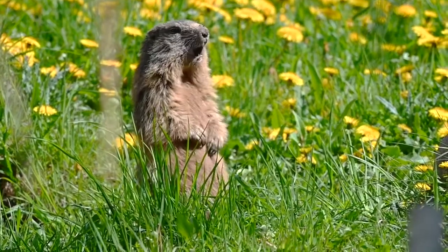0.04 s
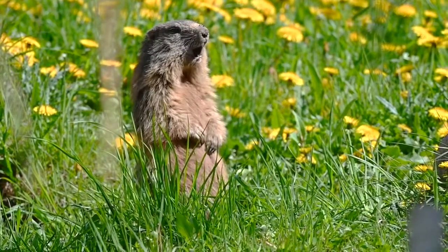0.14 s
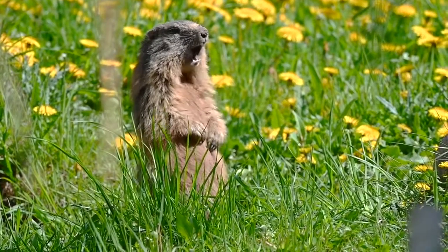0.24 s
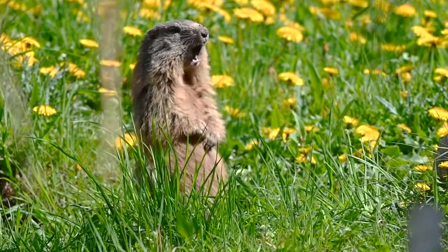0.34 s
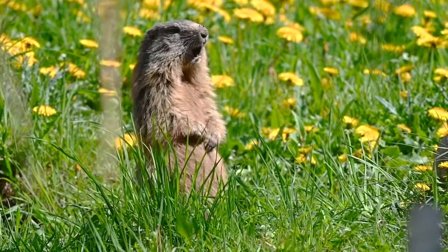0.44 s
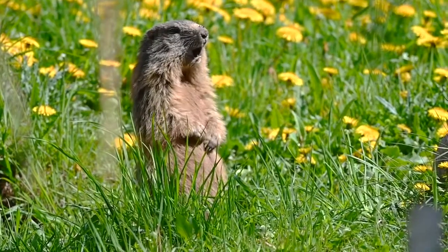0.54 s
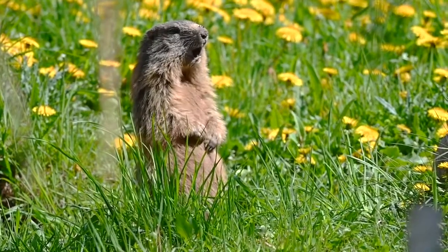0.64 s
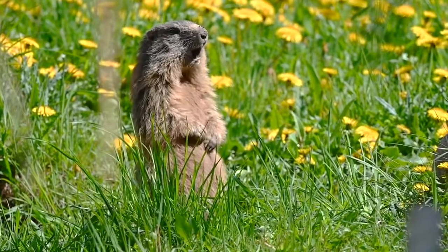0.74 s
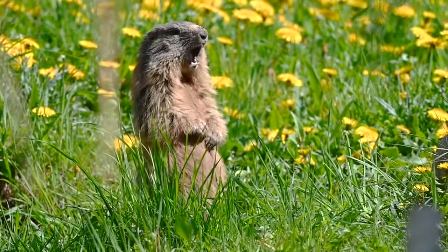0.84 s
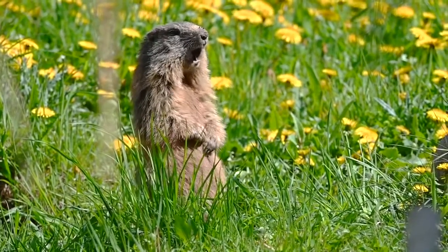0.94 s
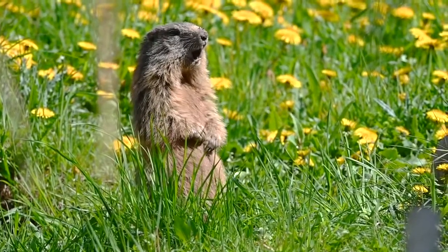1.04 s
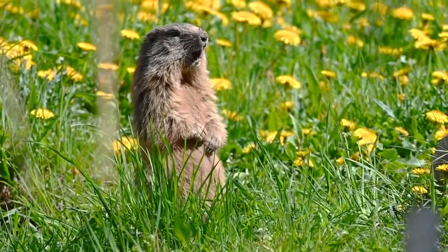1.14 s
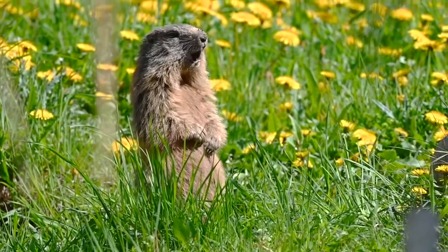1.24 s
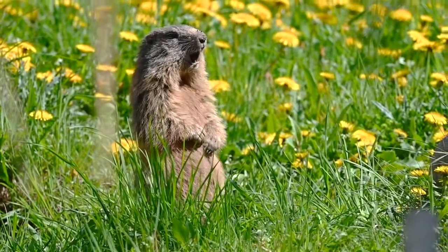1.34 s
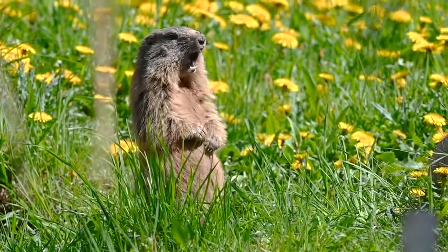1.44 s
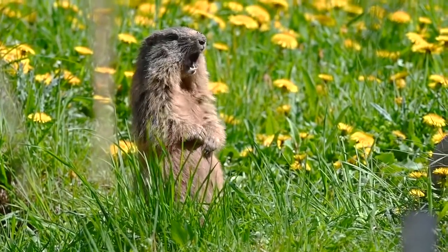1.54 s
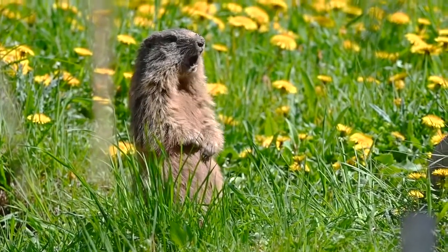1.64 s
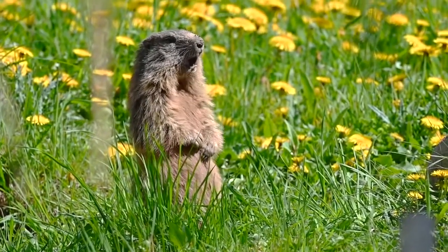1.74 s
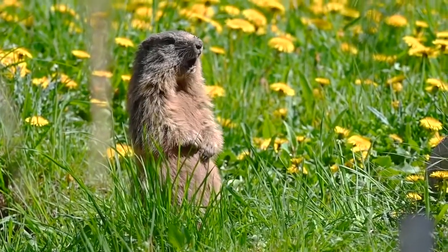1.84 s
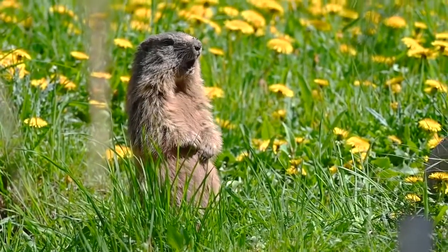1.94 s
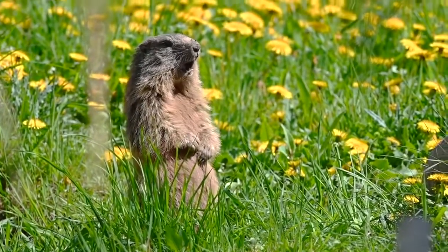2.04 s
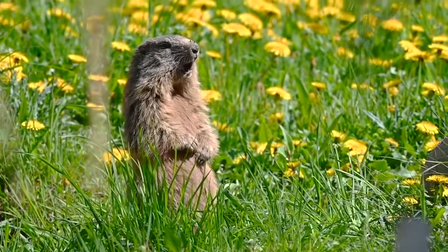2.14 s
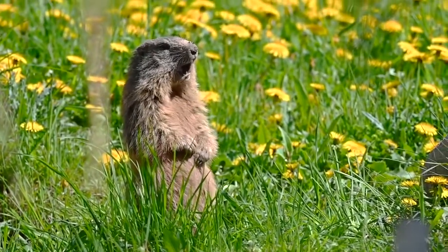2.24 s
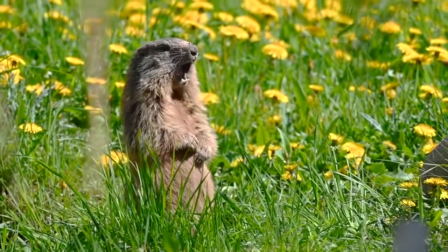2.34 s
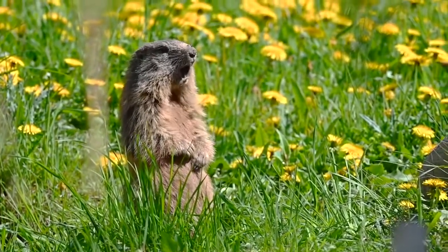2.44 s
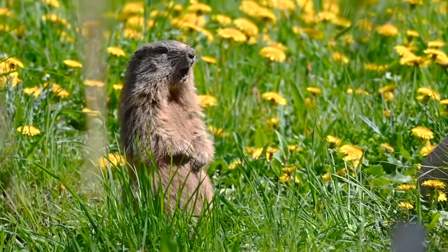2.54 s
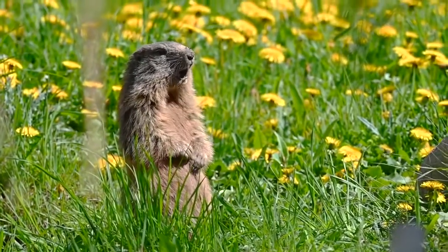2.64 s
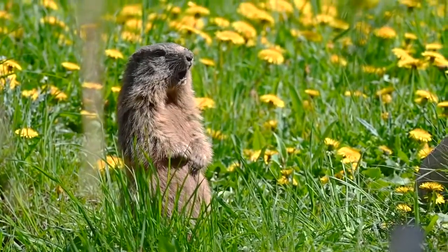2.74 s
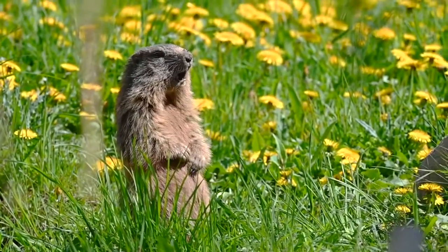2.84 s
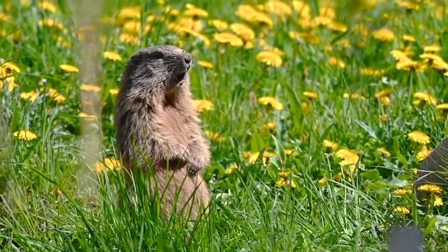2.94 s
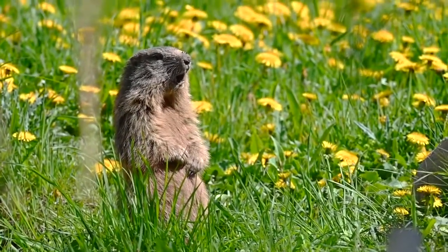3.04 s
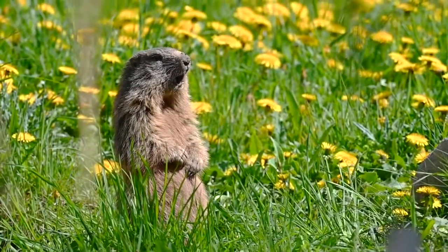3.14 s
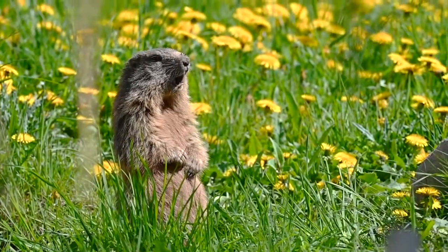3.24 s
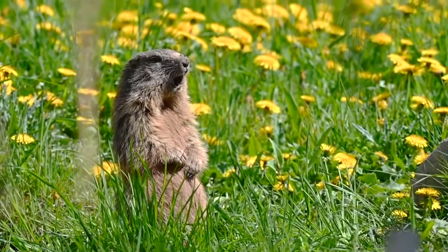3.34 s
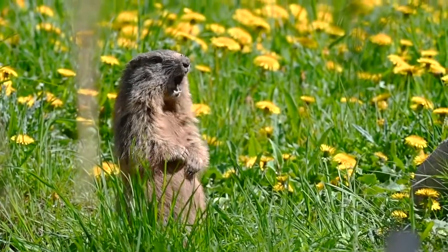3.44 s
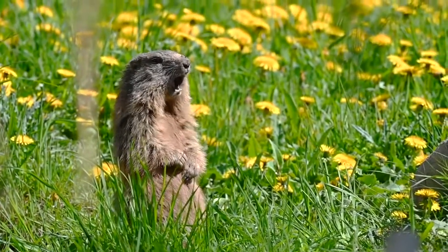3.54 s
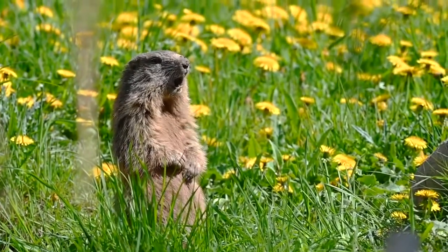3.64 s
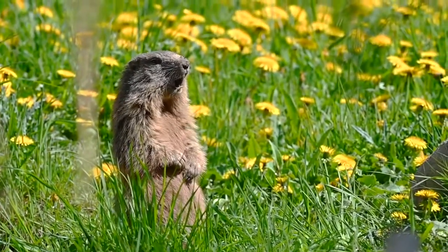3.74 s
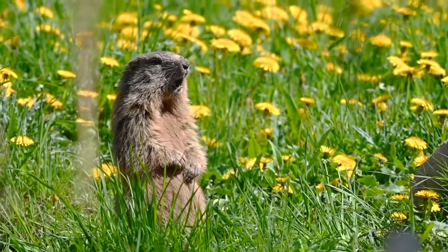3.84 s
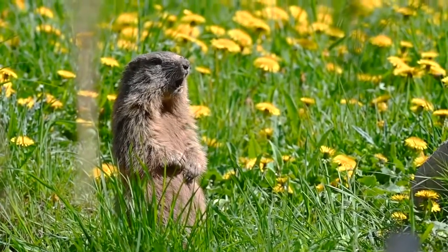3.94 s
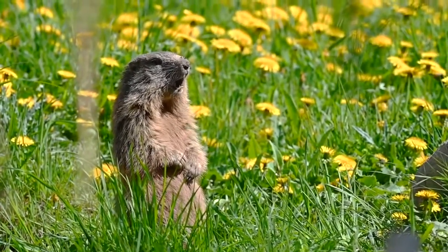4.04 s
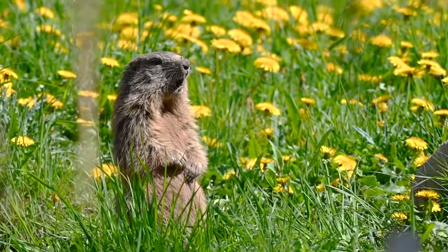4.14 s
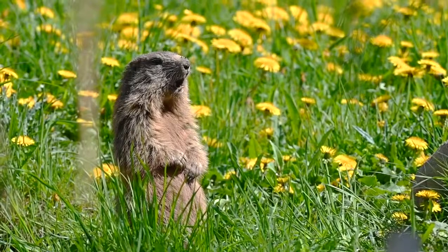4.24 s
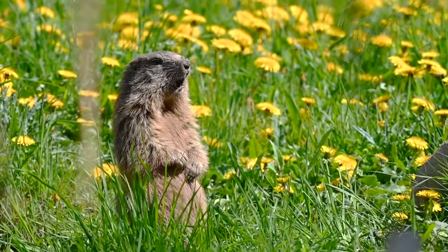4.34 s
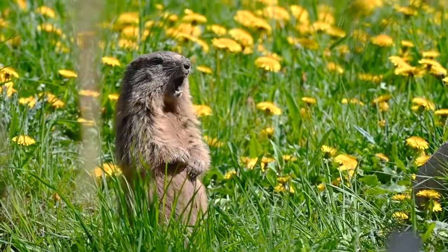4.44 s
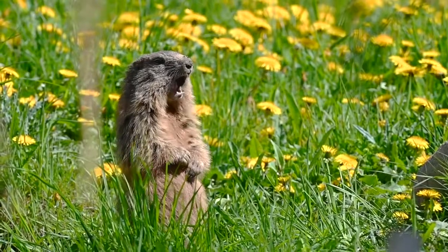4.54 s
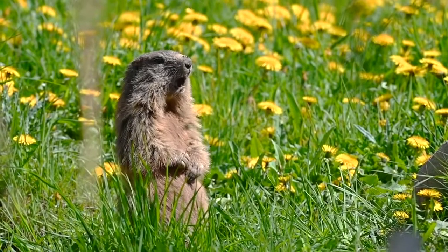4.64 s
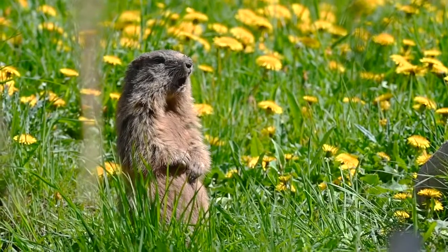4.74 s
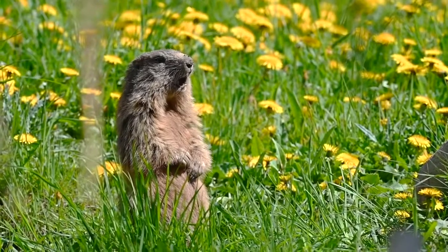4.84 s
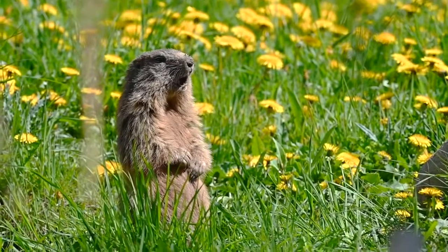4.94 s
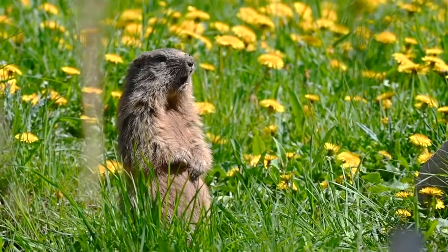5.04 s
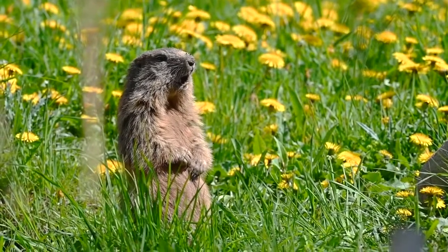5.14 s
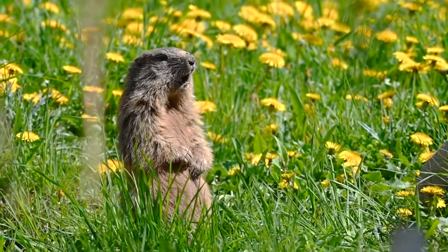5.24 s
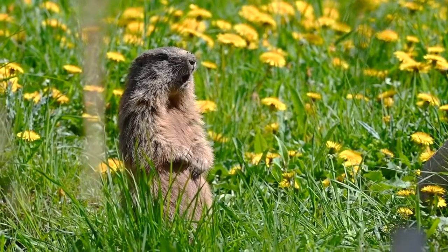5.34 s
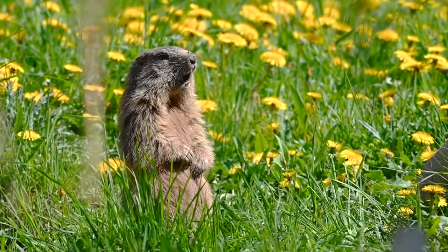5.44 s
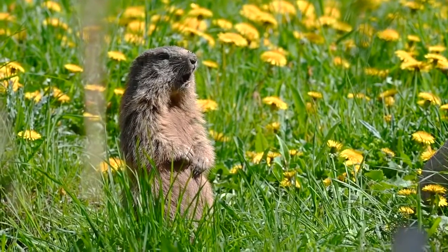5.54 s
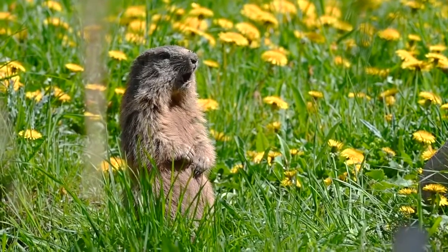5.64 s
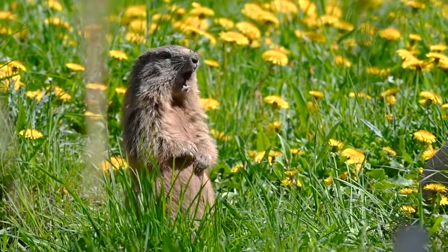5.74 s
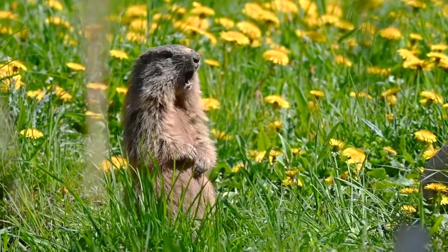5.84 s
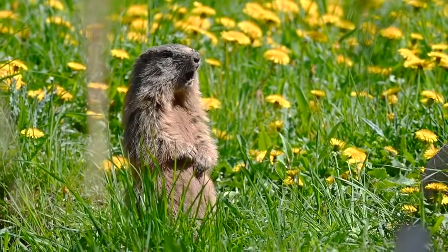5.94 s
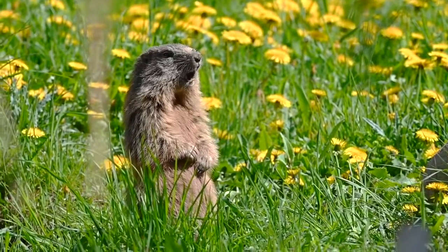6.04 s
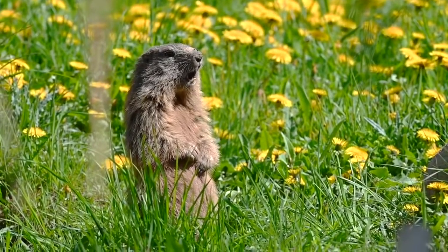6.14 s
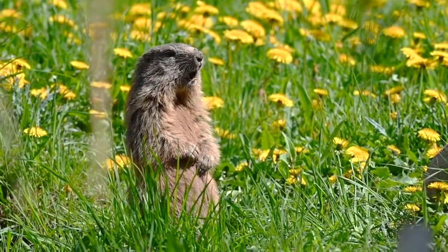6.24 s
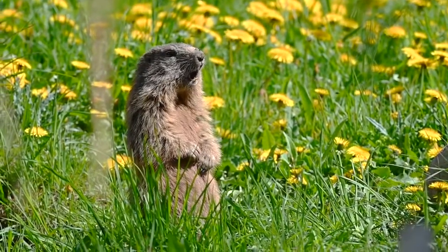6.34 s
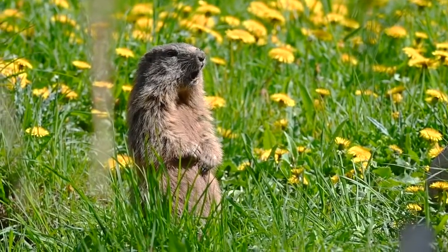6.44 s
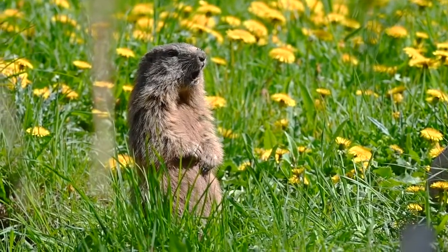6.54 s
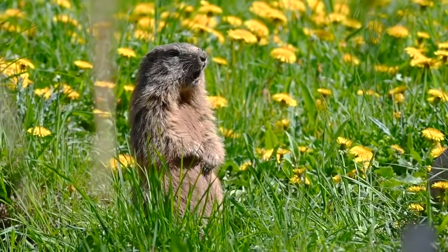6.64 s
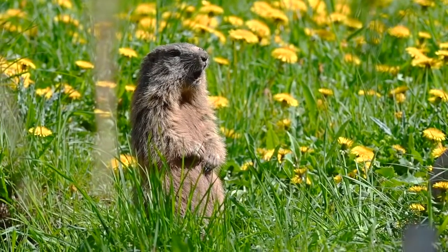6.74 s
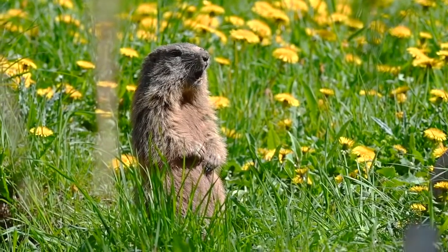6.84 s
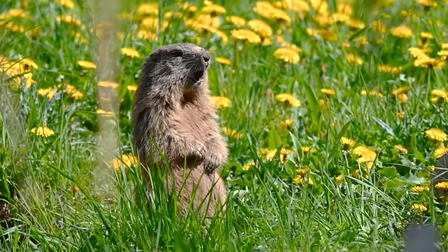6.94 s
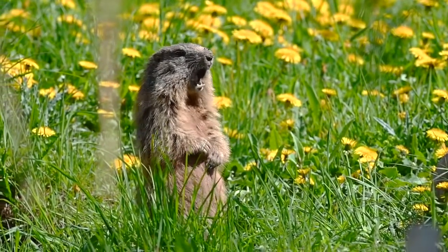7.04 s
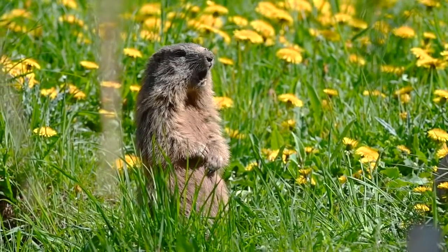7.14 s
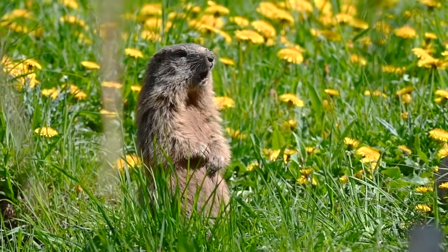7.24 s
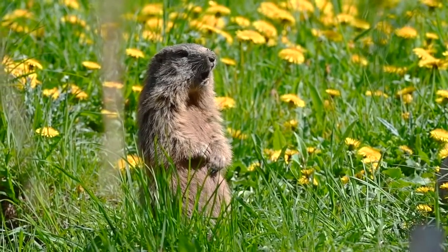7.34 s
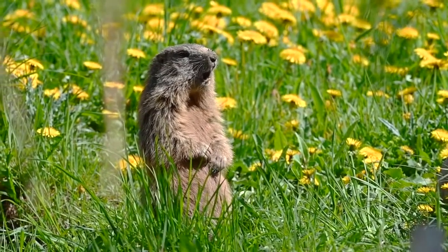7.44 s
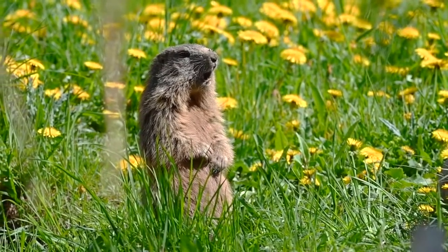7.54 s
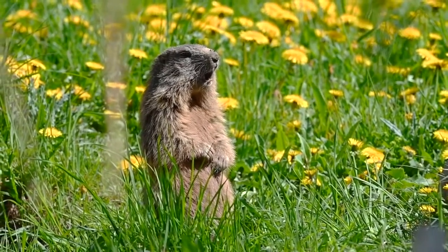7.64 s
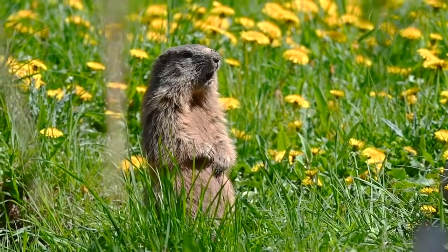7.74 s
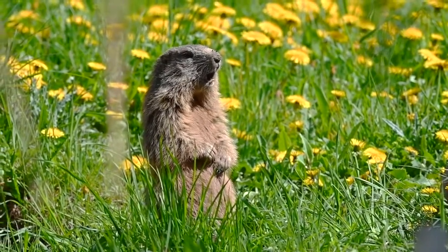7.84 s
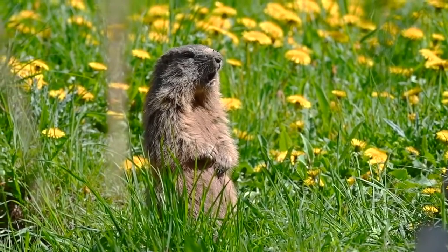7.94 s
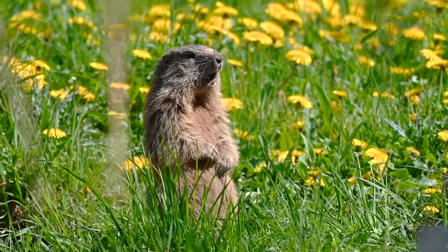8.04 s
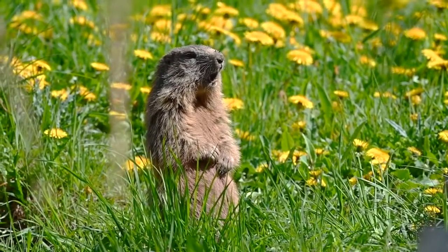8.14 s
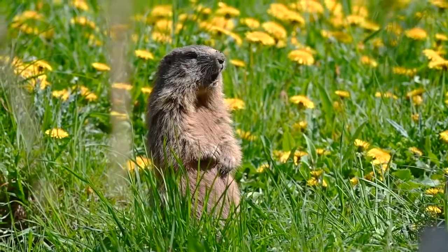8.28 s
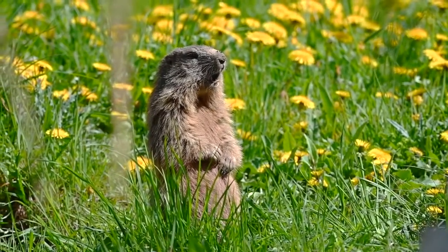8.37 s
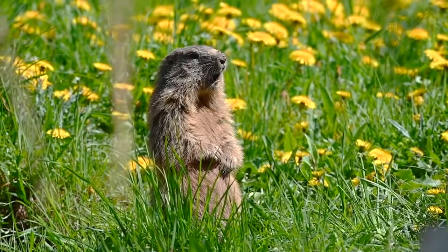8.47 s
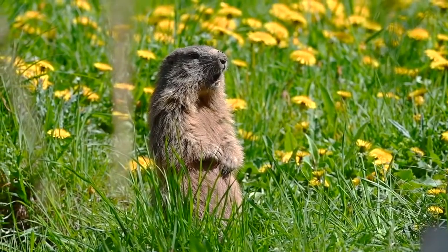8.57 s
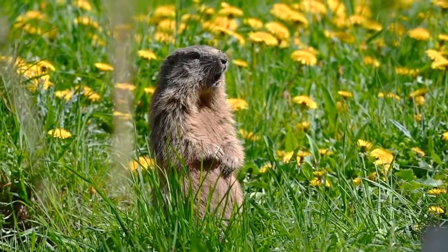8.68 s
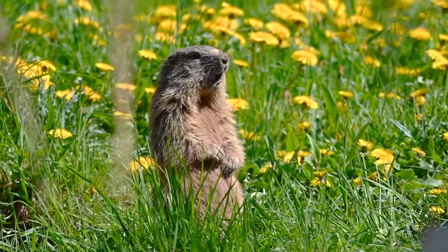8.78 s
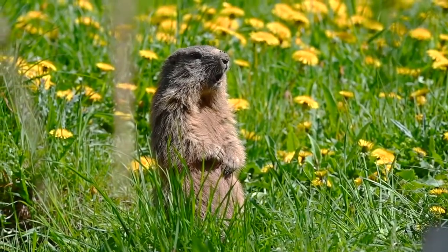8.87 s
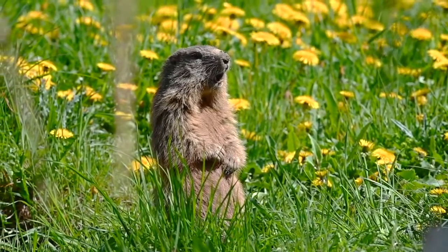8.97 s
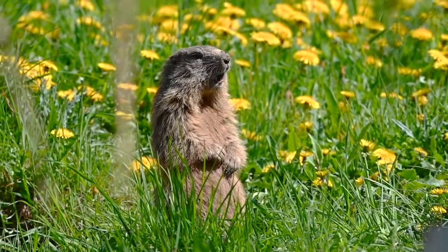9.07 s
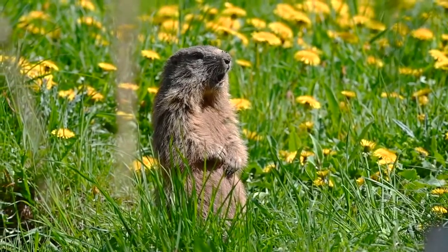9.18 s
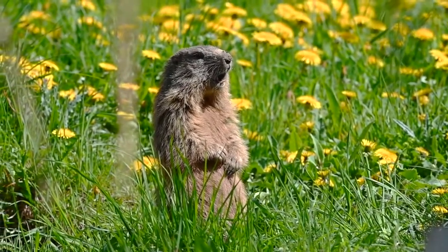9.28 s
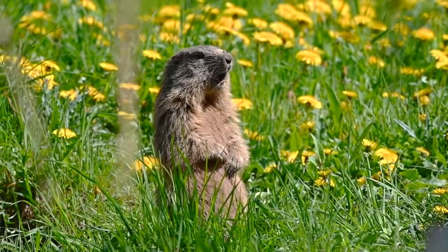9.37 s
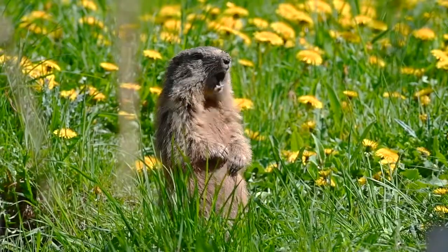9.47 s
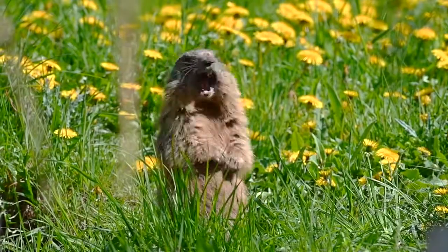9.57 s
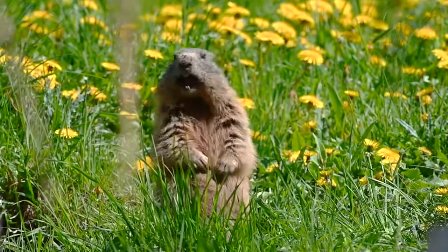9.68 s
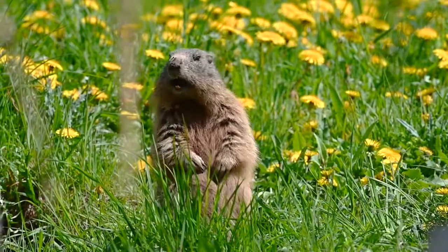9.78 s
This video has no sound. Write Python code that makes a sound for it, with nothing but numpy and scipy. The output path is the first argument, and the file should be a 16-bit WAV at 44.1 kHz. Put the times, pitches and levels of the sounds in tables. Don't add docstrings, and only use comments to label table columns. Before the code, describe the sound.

Sharp, short marmot alarm whistles ring out and echo across an open meadow, over soft air hiss, scattered sparrow chirps and a fading distant engine.

```python
import sys
import numpy as np
from scipy import signal
from scipy.fft import rfft, irfft
from scipy.io import wavfile
from scipy.ndimage import uniform_filter1d

SR = 44100
rng = np.random.default_rng(int(sys.argv[2]) if len(sys.argv) > 2 else 0)


def int16_out(signal):
    q = np.round(np.clip(np.atleast_2d(signal).T, -1, 1) * 32767)
    wavfile.write(sys.argv[1], SR, q.astype(np.int16))


def undo_db(level):
    steps = np.asarray(level, float) / 20
    return 10 ** steps


N = 432621
LEAD = SR // 2
LAG = 5


def evened(x):
    return x / np.sqrt(np.mean(x ** 2) + 1e-20)


def read(points, hz):
    f, value = np.transpose(points)
    return np.interp(np.log(hz + 1), np.log(f + 1), value)


def add(mix, s, sound):
    part = mix[:, LEAD + round(s * SR):][:, :sound.shape[1]]
    part += sound[:, :part.shape[1]]


def wobble(count, size):
    return evened(uniform_filter1d(uniform_filter1d(rng.standard_normal(count), size), size))


def balance(right_db):
    return undo_db([[-right_db / 2], [right_db / 2]])


def from_right(common, own, same, right_db):
    left = same * np.roll(common, LAG) + np.sqrt(1 - same ** 2) * own
    return np.array([left, common]) * balance(right_db)


def tone(rows, size, pitch_wobble, wobble_db):
    s, hz, db = np.transpose(rows)
    t = np.arange(s[0], s[-1], 1 / SR)
    hz = uniform_filter1d(np.interp(t, s, hz), size=130)
    hz = hz * (1 + pitch_wobble * wobble(len(t), size))
    level_db = np.interp(t, s, db) + wobble_db * wobble(len(t), size)
    level = undo_db(level_db) * signal.windows.tukey(len(t), .1)
    return np.sqrt(2) * level * np.sin(2 * np.pi * np.cumsum(hz) / SR)


# freq_hz, likeness_ratio
SAME = [(60, .998), (130, 0.98), (260, 1), (560, 0.74), (1200, 1), (2500, 0.14), (5000, 0.25),
        (10000, 0.12)]


def wash(spectrum, level_db, patchy_db):
    frames, hz = N // 256 + 5, np.fft.rfftfreq(1024, 1 / SR)
    a, b, c, d, patches = rng.standard_normal((frames, 513, 5)).T
    patches = uniform_filter1d(patches, size=10, axis=0)
    patches = evened(uniform_filter1d(patches, size=20, axis=1))
    same = np.clip(read(SAME, hz), 0, 1)[:, None]
    late = np.exp(-2j * np.pi * hz * LAG / SR)[:, None]
    right = a + 1j * b
    left = same * late * right + np.sqrt(1 - same ** 2) * (c + 1j * d)
    z = np.array([left, right]) * undo_db(read(spectrum, hz)[:, None] + patchy_db * patches)
    return undo_db(level_db) * evened(signal.istft(z, nperseg=1024, noverlap=768)[1][:, :N])


# freq_hz, density_db_per_hz
MEADOW = [(15, -38), (25, -8), (64, 5), (92, -9.5), (124, -6.5), (288, -11), (353, -8.5), (759, -21.5),
          (954, -18), (1230, -24), (1360, -24.5), (8750, -38), (11000, -47.5), (14300, -82), (22000, -120)]


def meadow():
    return wash(MEADOW, -46, patchy_db=1.0)


# freq_hz, density_db_per_hz
VEHICLE = [(30, -33), (90, -2.5), (170, -5.5), (280, -3), (520, -10.5), (800, -13.5), (1600, -14),
           (2500, -19), (4500, -24), (9000, -39), (11000, -49.5)]
# nearest_s, half_gap_m, level_db
PASSES = [
    (1.0, 11, -35),
    (5.3, 5, -50),
    (8.0, 6, -51),
]


def road():
    traffic_db, road_m_per_s, screen_db_per_m = -60, 15, .3
    t = np.arange(0, N / SR + .1, .02)
    power = undo_db(2 * traffic_db)
    for s, gap, db in PASSES:
        metres = np.hypot(gap, road_m_per_s * (t - s))
        power = power + (undo_db(db - screen_db_per_m * (metres - gap)) * gap / metres) ** 2
    level_db = np.interp(np.arange(N) / SR, t, 10 * np.log10(power))
    return wash(VEHICLE, level_db, patchy_db=1.1)


# time_s, pitch_hz, level_db
ENGINE = [(0.0, 94, -45.5), (0.06, 87.7, -50), (0.68, 88.6, -40), (0.86, 74.5, -47), (1.05, 86.7, -37.5),
          (2.19, 80.3, -47), (2.57, 63.8, -44), (3.56, 71.5, -44.5), (4.2, 62.5, -49.5),
          (4.31, 70.24, -48.5), (7.53, 59.84, -49), (7.7, 70.8, -51.5)]
# start_s, length_s, first_hz, last_hz, level_db
DRONES = [
    (0, 1.9, 240, 287, -43),
    (.7, 2.0, 322, 292, -40),
    (-.5, 10.9, 318.8, 315.8, -52),
    (7.75, 2.2, 115, 118, -50),
    (8.2, 1.75, 41, 39.5, -47),
]
# loudest_share_of_length, start_db, end_db
SWELLS = [(0.49, -10, -10), (0.18, -5.5, -16.5), (.1, 1, -7.5), (0.99, -8, 1.5), (.8, -13, 5)]


def hums(mix):
    lines = [ENGINE]
    for (s, length, first_hz, last_hz, db), (share, start_db, end_db) in zip(DRONES, SWELLS):
        share = np.clip(share, .02, .98)
        loudest = (s + share * length, first_hz + share * (last_hz - first_hz), db)
        lines.append([(s, first_hz, db + start_db), loudest, (s + length, last_hz, db + end_db)])
    for rows in lines:
        line = tone(rows, size=3000, pitch_wobble=0.978 / rows[0][1], wobble_db=2.4)
        add(mix, rows[0][0], np.tile(line, (2, 1)))


# start_s, level_db, pitch_hz, t60_s
KNOCKS = [
    (3.6882, -26, 341, 0.026),
    (7.186, -27.5, 307, 0.013),
    (8.357, -41, 1710, 0.011),
    (8.376, -35.5, 1810, 0.0069),
]


def knocks(mix):
    t = np.arange(2000) / SR
    for s, db, hz, t60 in KNOCKS:
        add(mix, s, np.tile(undo_db(db - 60 * t / t60) * np.sin(2 * np.pi * hz * t), (2, 1)))


def scattered(x, t60, wet_db, right_db):
    t = np.arange(SR // 6) / SR
    decay = undo_db(-60 * t / t60) * undo_db(wet_db - 10 * np.log10(t60 * SR / 14))
    a, b = rng.standard_normal((2, len(t))) * decay
    a[0] += 1
    b[0] += 1
    if right_db > 2:
        tail = from_right(a, b, 0.49, right_db)
    else:
        tail = np.array([a, 1.28 * a + .5 * b]) * balance(right_db)
    return signal.fftconvolve(x[None], tail, axes=1)


# after_start_s, pitch_hz, level_db
HOARSE = [(0, 4600, -16), (.018, 5447, -10), (0.036, 4560, -1.5), (.06, 4300, 1.5), (0.069, 3913, -4),
          (0.075, 3404, -1.5), (.1, 3250, -2), (0.121, 3047, -7), (0.139, 2770, -17)]
# start_s, level_db, pitch_ratio
HOARSE_AT = [
    (.97, -50.5, 1.06),
    (2.747, -48.5, 1.03),
    (4.184, -48, 1),
    (4.68, -52.5, 0.91),
    (5.884, -46.5, 1.02),
    (7.132, -48, .99),
    (8.173, -46.5, 1.01),
    (9.01, -47.5, 0.99),
]


def hoarse_sparrow(mix):
    voices = [(1, 0.0), (.76, -8.5), (1.85, -19.5)]  # pitch_ratio, level_db
    for s, db, factor in HOARSE_AT:
        rows = np.array(HOARSE) * [1, factor, 1] + [0, 0, db]
        chirp = 0
        for ratio, voice_db in voices:
            voice = tone(rows * [1, ratio, 1], size=60, pitch_wobble=.04, wobble_db=5.5)
            chirp = chirp + undo_db(voice_db) * voice
        add(mix, s, undo_db(-1.5) * scattered(chirp, t60=0.2, wet_db=3.5, right_db=2.5))


def note(s, length, top_hz, foot_hz, db, top_at):
    ends_db, top_db = -5, -3.5
    half_drop = 0.57
    first_hz = foot_hz if top_at > .1 else top_hz
    halfway = (s + (1 + top_at) / 2 * length, top_hz - half_drop * (top_hz - foot_hz), db)
    return [(s, first_hz, db + ends_db), (s + top_at * length, top_hz, db + top_db), halfway,
            (s + length, foot_hz, db + ends_db)]


# start_s, length_s, top_hz, foot_hz, level_db
ARCHES = [(1.987, .035, 4700, 3600, -58), (2.023, 0.051, 4040, 2900, -58), (3.878, 0.034, 4570, 4200, -56),
          (3.912, 0.066, 3930, 2910, -56.5), (4.337, .035, 4600, 3900, -62),
          (6.231, 0.067, 4400, 2890, -53), (6.31, 0.031, 4160, 2780, -51), (6.743, 0.094, 6100, 3950, -63),
          (6.87, 0.037, 4560, 3650, -61), (7.407, 0.052, 4300, 3000, -55), (7.462, 0.066, 3440, 2590, -54),
          (7.901, 0.038, 4620, 3900, -53.5), (7.939, 0.068, 3990, 2790, -56.5),
          (8.655, 0.062, 4400, 2990, -52), (8.722, 0.056, 3700, 2720, -52)]
# start_s, length_s, top_hz, foot_hz, level_db
SLIDES = [
    (5.137, 0.044, 4150, 4100, -65),
    (5.19, 0.057, 4180, 2333, -55),
    (5.51, .15, 4170, 4020, -70),
    (8.8, .015, 5560, 4200, -67),
    (8.927, .02, 5330, 3770, -61),
    (9.215, 0.07, 4220, 2560, -54),
]


def clear_sparrow(mix):
    arches = [note(*row, top_at=0.28) for row in ARCHES]
    slides = [note(*row, top_at=0.051) for row in SLIDES]
    for rows in arches + slides:
        chirp = tone(rows, size=90, pitch_wobble=0.022, wobble_db=4.5)
        add(mix, rows[0][0], undo_db(-5) * scattered(chirp, t60=0.22, wet_db=-5, right_db=1.46))


def scatter(t):
    grass_t60, grass_fills_s = .13, .006
    field_t60, field_ends_s = 1.02, 0.37
    slope_s, slope_deep_s, valley_t60 = 0.27, 0.037, 3.46
    grass = undo_db(-17 - 60 * t / grass_t60) * np.minimum(t / grass_fills_s, 1)
    field = undo_db(-24 - 60 * t / field_t60) / (1 + np.exp((t - field_ends_s) / .015))
    facing = undo_db(-32) * np.exp(-.5 * ((t - slope_s) / slope_deep_s) ** 2)
    valley = undo_db(-49.5 - 60 * t / valley_t60)
    return np.sqrt(grass ** 2 + field ** 2 + facing ** 2 + valley ** 2)


# freq_hz, gain_db
ECHO_COLOUR = [(500, 1.5), (2100, -13), (3300, 4), (4300, -6.5), (5600, 0), (7000, 4), (11000, -31)]


def slope(steady):
    t = np.arange(steady.shape[1]) / SR
    colour = undo_db(read(ECHO_COLOUR, np.fft.rfftfreq(len(t), 1 / SR)))
    stirred = 0.82 * steady + 0.76 * rng.standard_normal(steady.shape)
    a, b = irfft(rfft(stirred) * colour, len(t))
    near = np.exp(-t / 0.021)
    around = np.array([a, .2 * a + .95 * b])
    pair = near * around + (1 - near) * from_right(a, b, same=.75, right_db=4.5)
    return pair * scatter(t) * undo_db(3.2 * wobble(len(t), size=200) - 28.5)


RISE_S = .047


def whistle_pitch(place, top_hz):
    rest_hz, foot_hz, end_hz = 1274, 1083, 2626
    rising = place < 1
    depth_hz = top_hz - np.where(rising, foot_hz, end_hz)
    power = np.where(rising, 2.25, 2.1)
    hz = top_hz * .993 - depth_hz * abs(place - 1) ** power
    return uniform_filter1d(np.clip(hz, np.where(place > 1, end_hz - 60, rest_hz), None), size=200)


# freq_hz, gain_db
MOUTH = [(1250, -17), (2000, -11), (2350, -1.5), (2900, 1.5), (3500, -1.5), (5300, 1), (6000, -17.5),
         (7000, -13.5)]
OVERTONES_DB = [1.5, -5, -25]
OVERTONE_FADE_DB_PER_S = [1.5, 169, 205]


def whistle(fall, top_hz, db):
    attack_s, release_db_per_s, sag_db, whistle_db = 0.0047, 2999, -11, 4.5
    brightest_s, brighten_db_per_s = .014, 1100
    breath_db, breath_fade_db_per_s, breath_leads_s = -20.5, 190, .003
    rasp_db, rasp_fade_db_per_s = -10, 380

    t = np.arange(-.2 * RISE_S, RISE_S + fall + .012, 1 / SR)
    place = np.where(t < RISE_S, t / RISE_S, 1 + (t - RISE_S) / fall)
    falling = np.clip(place - 1, 0, 1)
    effort_db = db + whistle_db + 20 * np.minimum(t, 0) / attack_s + sag_db * falling ** 2
    effort_db = effort_db - release_db_per_s * np.maximum(t - RISE_S - fall, 0)

    hz = whistle_pitch(place, top_hz)
    jitter = 0.0036 + 0.045 * np.clip(.6 - place, 0, 1)
    phase = 2 * np.pi * np.cumsum(hz * (1 + jitter * wobble(len(t), size=50))) / SR

    band = signal.butter(3, [2000, 7300], "band", fs=SR)
    breath = evened(signal.lfilter(*band, rng.standard_normal(len(t))))
    breath_level_db = breath_db - breath_fade_db_per_s * abs(t - brightest_s)
    breath_level_db = breath_level_db - 20 * np.clip(t, -breath_leads_s, 0) / attack_s
    call = undo_db(breath_level_db) * breath

    rasp = 1 + undo_db(rasp_db - rasp_fade_db_per_s * np.maximum(t, 0)) * wobble(len(t), size=28)
    for k, (start_db, fade_db) in enumerate(zip(OVERTONES_DB, OVERTONE_FADE_DB_PER_S), 1):
        level_db = start_db - fade_db * t + read(MOUTH, k * hz) + 1.1 * k * wobble(len(t), size=70)
        level_db = level_db - (k > 1) * brighten_db_per_s * np.maximum(brightest_s - t, 0)
        level_db = level_db + .5 * (k - 1) * sag_db * falling
        call = call + np.sqrt(2) * np.sin(k * phase) * undo_db(level_db) * rasp
    return undo_db(effort_db) * call


# start_s, fall_s, top_hz, level_db
WHISTLES = [
    (0, 0.057, 3520, -21),
    (.2194, 0.026, 3478, -17.5),
    (.7786, 0.029, 3466, -17),
    (1.4199, 0.034, 3503, -17),
    (2.268, 0.037, 3484, -17),
    (3.3811, .046, 3532, -16),
    (4.4097, .044, 3514, -17),
    (5.6769, .045, 3508, -16.5),
    (6.9362, 0.048, 3507, -16),
    (9.4591, 0.057, 3560, -15.5),
]


def marmot(mix):
    earlier_s = .23
    steady = rng.standard_normal((2, int(.7 * SR)))
    for k, (s, *rest) in enumerate(WHISTLES):
        call = whistle(*rest)[None]
        s = s - .2 * RISE_S - earlier_s * (k == 0)
        add(mix, s, np.vstack([call, np.roll(call, 1)]) * undo_db([[.4], [-.6]]))
        add(mix, s, signal.fftconvolve(call, slope(steady), axes=1))


def scene():
    mix = np.zeros((2, LEAD + N))
    for source in (marmot, hoarse_sparrow, clear_sparrow, knocks, hums):
        source(mix)
    return mix[:, LEAD:] + meadow() + road()


def ducked(dry):
    recovery_db_per_s, split_hz, bass_duck = 15.0, 480, .35
    power_db = 10 * np.log10(abs(uniform_filter1d((dry ** 2).mean(0), size=800)) + 1e-12)
    recovery_db = np.arange(N) * recovery_db_per_s / SR
    wanted_db = np.clip(power_db + 29, 0, 4.5)
    duck_db = np.maximum.accumulate(wanted_db + recovery_db) - recovery_db
    duck_db = uniform_filter1d(duck_db, size=200)
    bass = signal.filtfilt(*signal.butter(2, split_hz, fs=SR), dry)
    return (dry - bass) / undo_db(duck_db) + bass / undo_db(bass_duck * duck_db)


# above_hz, reach_db
MASKING = [(300, -14), (1500, -27.5), (1900, -45), (9000, -70)]
# freq_hz, threshold_sigma
DROPOUT = [(2000, 2.1), (4000, 1.8), (5200, 1.5), (6000, 2), (7300, 2), (7900, .2), (8600, 2.1),
           (10500, 1.5)]


def starved(x):
    bands_count, wide, edge_hz = 64, 8, 10950
    hz, _, z = signal.stft(x, SR, nperseg=1024, noverlap=768)
    z = z[:, :-1]
    bands = (abs(z) ** 2).mean(0).reshape(bands_count, wide, -1).mean(1)
    centre = hz[wide // 2::wide, None]
    above = centre - centre.T
    spread_db = np.where(above > 0, read(MASKING, abs(above)), -100)
    first = abs(centre - 8450) < 1150
    spread_db = np.maximum(spread_db, np.where(first, -44, -100))
    held = uniform_filter1d(bands, size=9, axis=1)
    limit = (undo_db(2 * spread_db) * (centre.T > 2000)) @ held
    luck = uniform_filter1d(rng.standard_normal(bands.shape), size=9, axis=1)
    luck = evened(uniform_filter1d(luck, size=7, axis=1))
    lost = (held < limit * undo_db(4 * luck)) | (luck > read(DROPOUT, centre))
    keep = np.where(lost & (centre > 1700), .07, 1)
    noise = rng.standard_normal((*z.shape, 2)) @ [1, 1j]
    grain = undo_db(-16) * np.sqrt(bands / 2).repeat(wide, 0) * noise
    kept = (z + grain) * keep.repeat(wide, 0) * (hz[:-1] < edge_hz)[:, None]
    return signal.istft(kept, SR, nperseg=1024, noverlap=768, nfft=1024)[1][:, :N]


def band_limit(x):
    return signal.sosfilt(signal.butter(12, 11420, fs=SR, output="sos"), x)


def record(dry):
    mix = starved(undo_db(1.49) * ducked(dry))
    return band_limit(mix)


dry = scene()
out = record(dry)
int16_out(out)
```